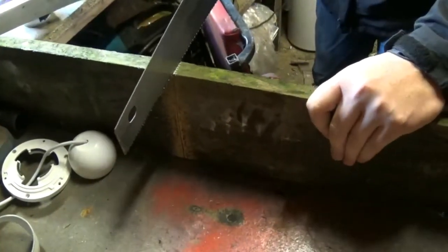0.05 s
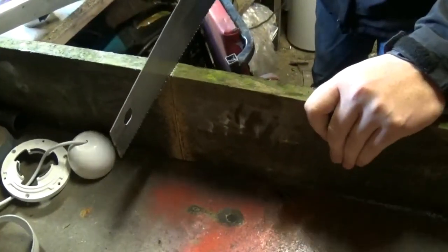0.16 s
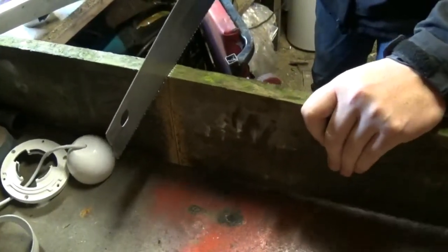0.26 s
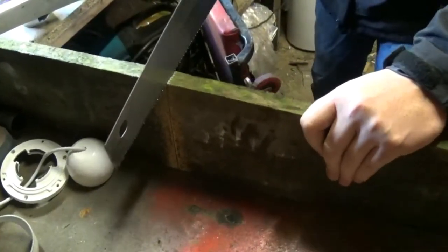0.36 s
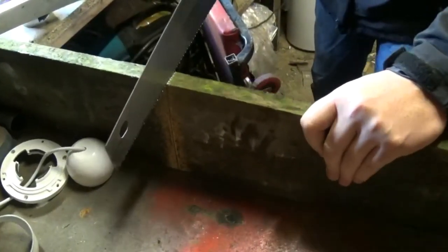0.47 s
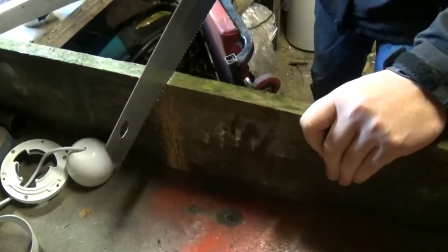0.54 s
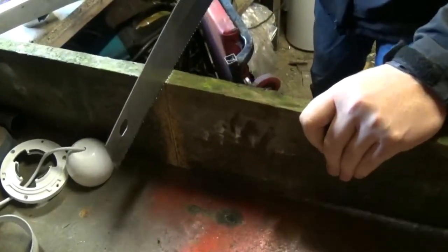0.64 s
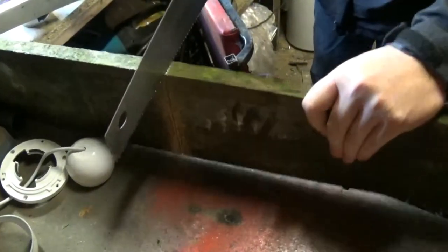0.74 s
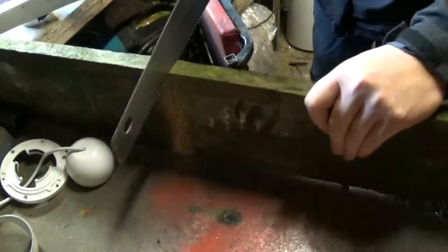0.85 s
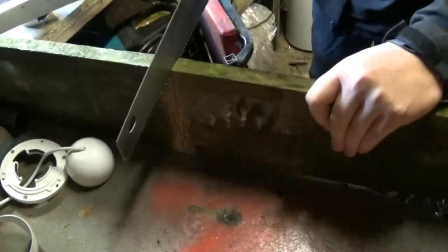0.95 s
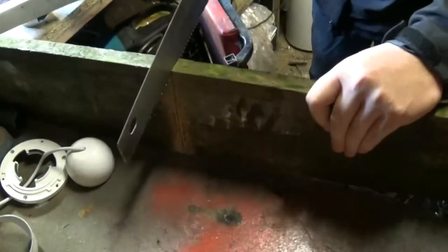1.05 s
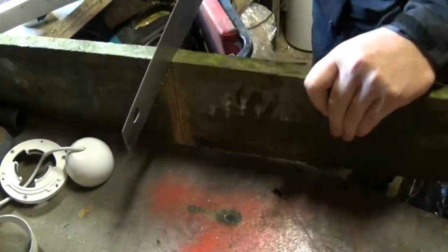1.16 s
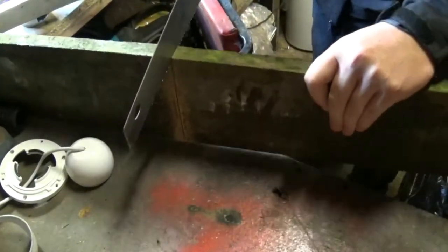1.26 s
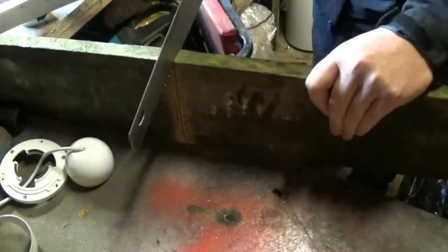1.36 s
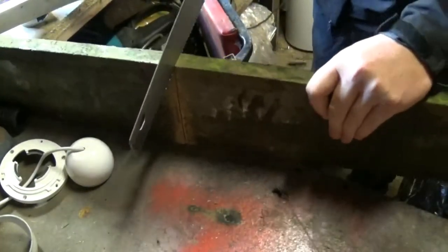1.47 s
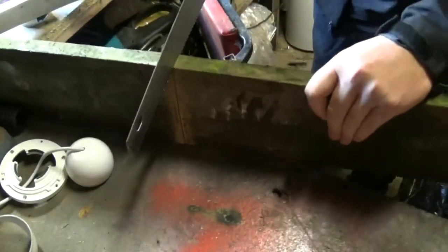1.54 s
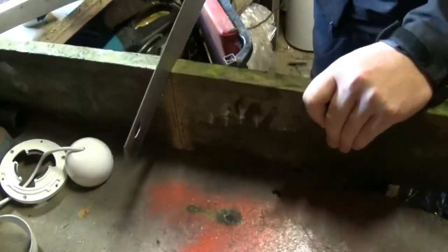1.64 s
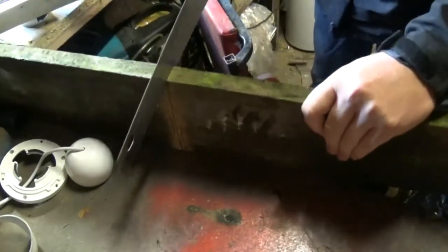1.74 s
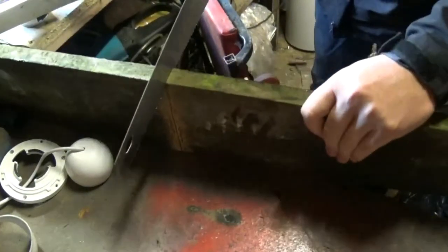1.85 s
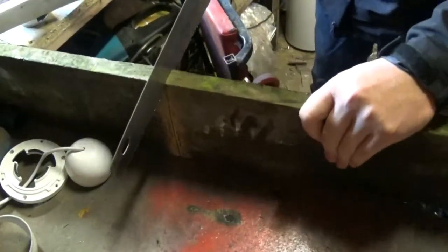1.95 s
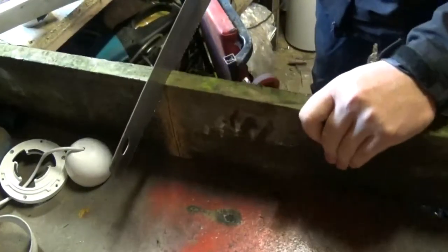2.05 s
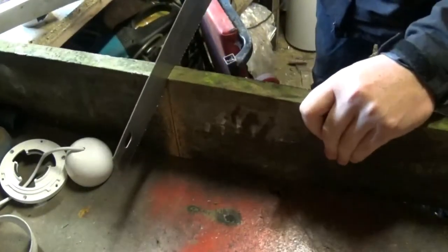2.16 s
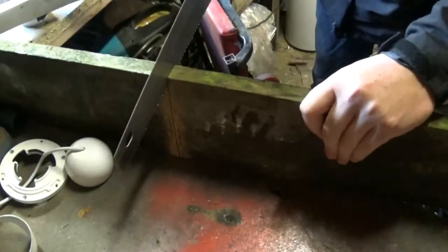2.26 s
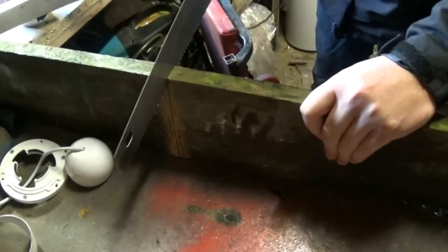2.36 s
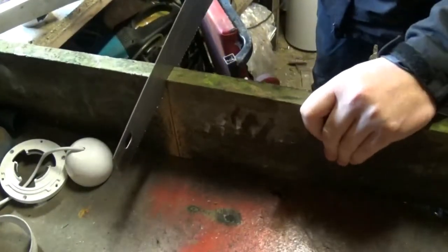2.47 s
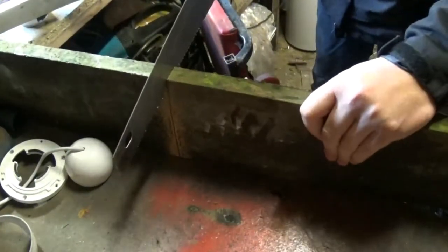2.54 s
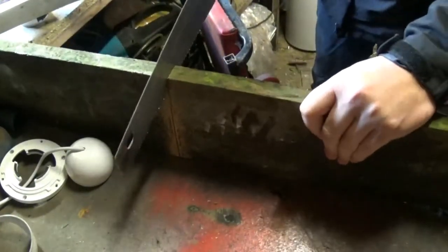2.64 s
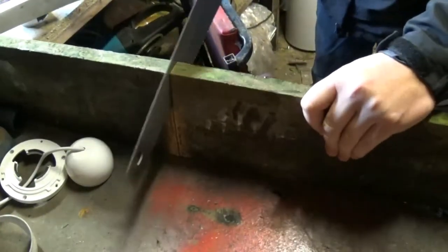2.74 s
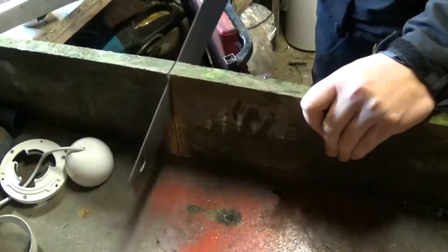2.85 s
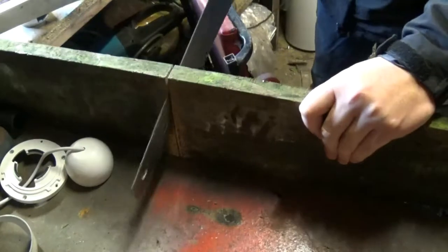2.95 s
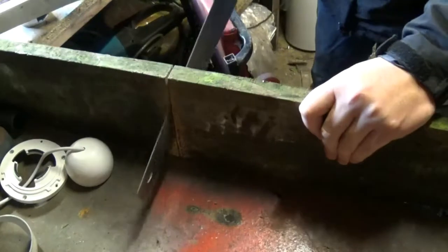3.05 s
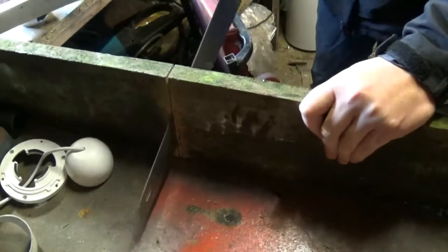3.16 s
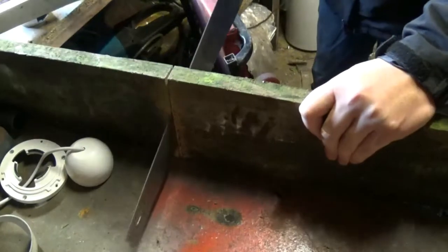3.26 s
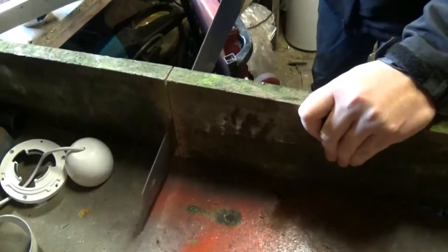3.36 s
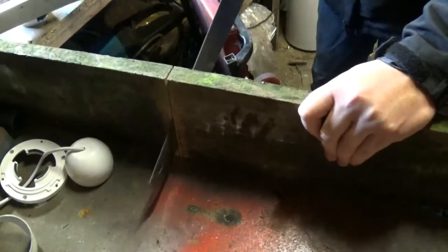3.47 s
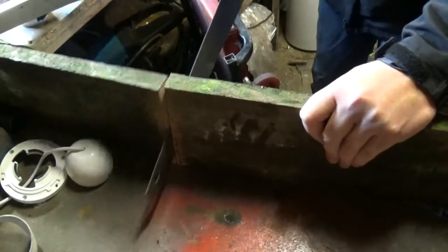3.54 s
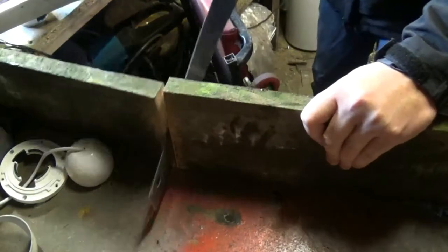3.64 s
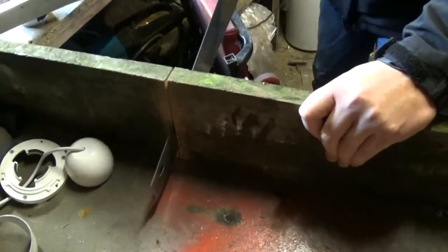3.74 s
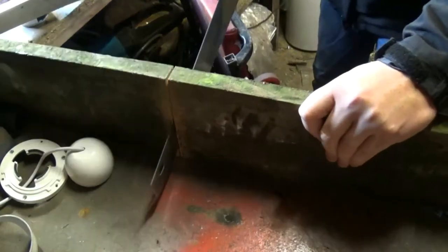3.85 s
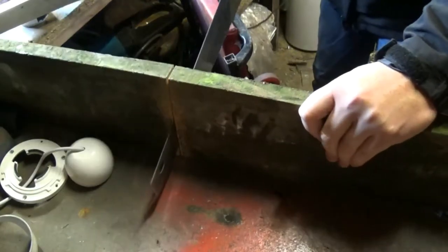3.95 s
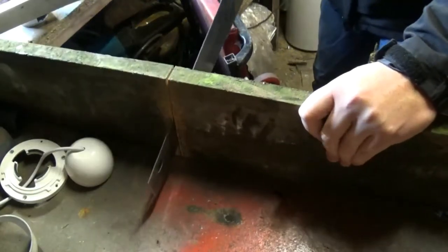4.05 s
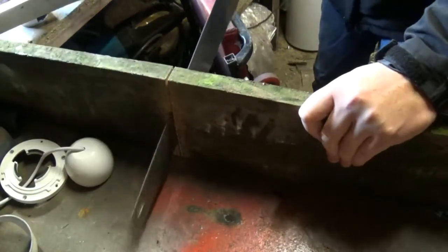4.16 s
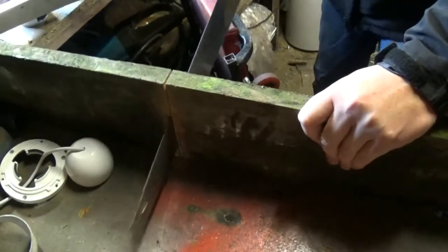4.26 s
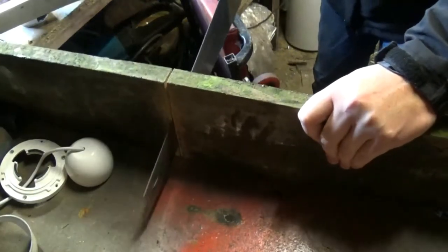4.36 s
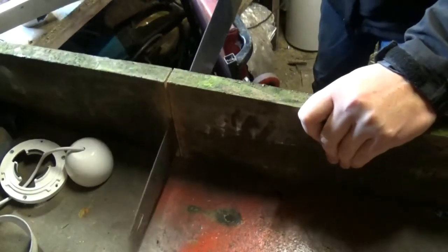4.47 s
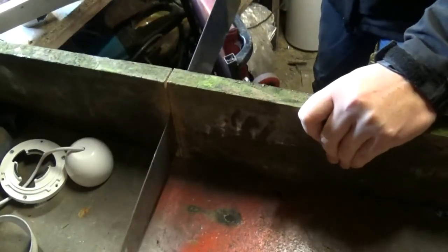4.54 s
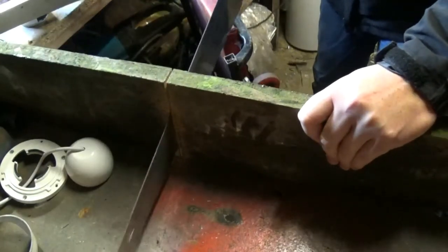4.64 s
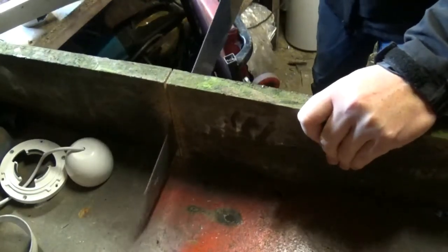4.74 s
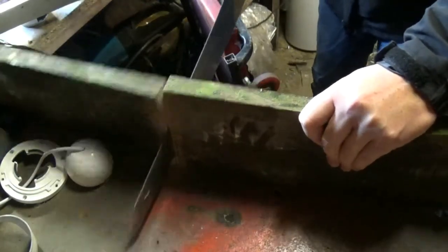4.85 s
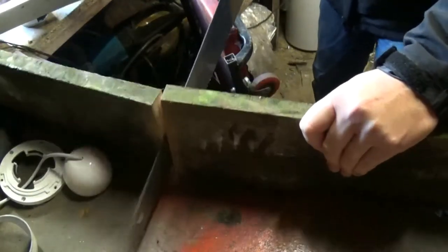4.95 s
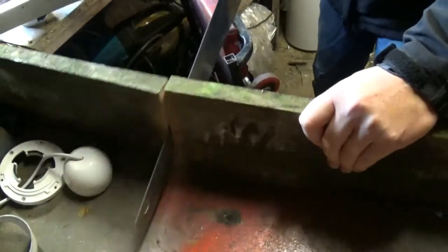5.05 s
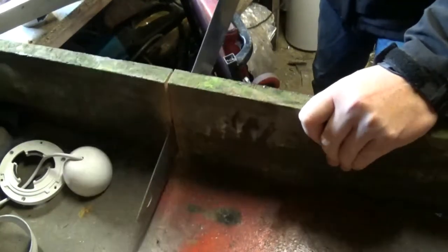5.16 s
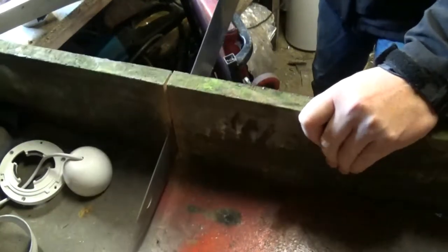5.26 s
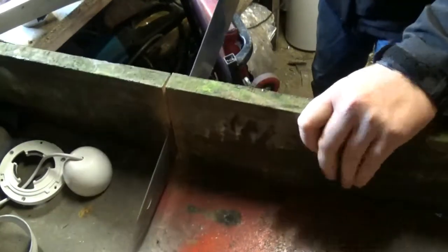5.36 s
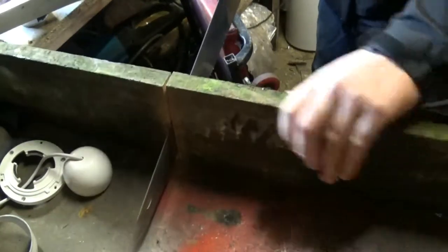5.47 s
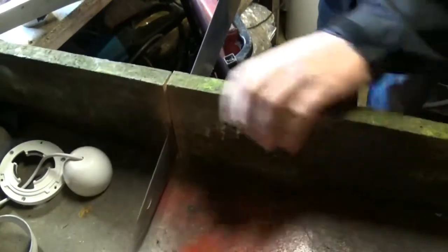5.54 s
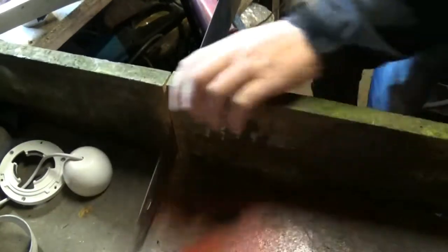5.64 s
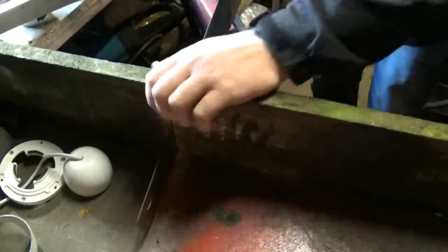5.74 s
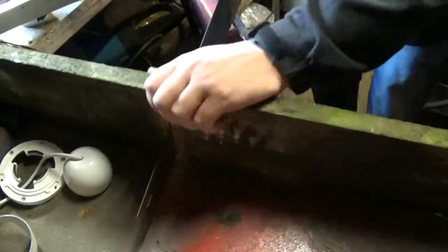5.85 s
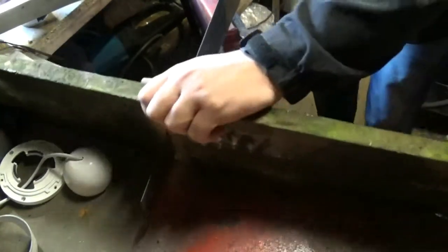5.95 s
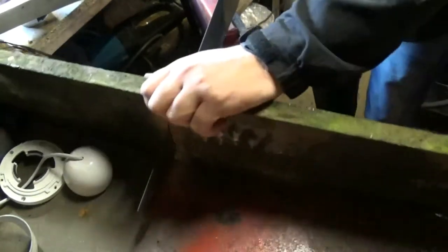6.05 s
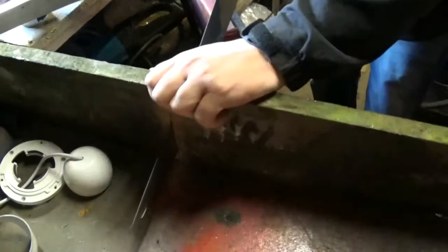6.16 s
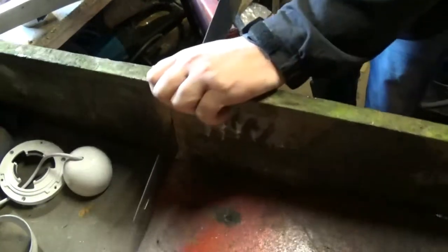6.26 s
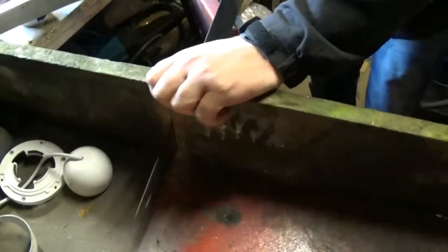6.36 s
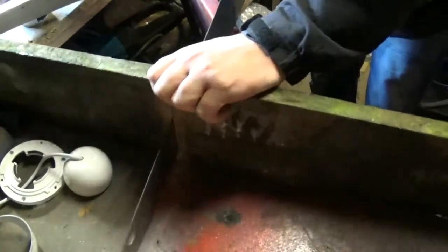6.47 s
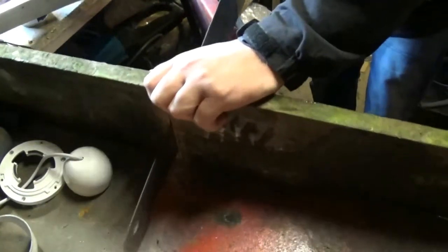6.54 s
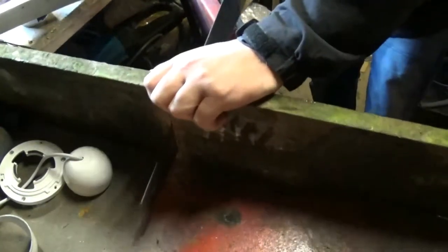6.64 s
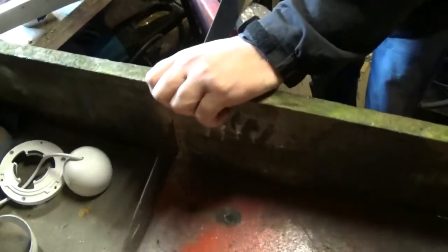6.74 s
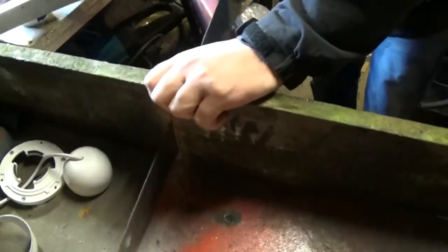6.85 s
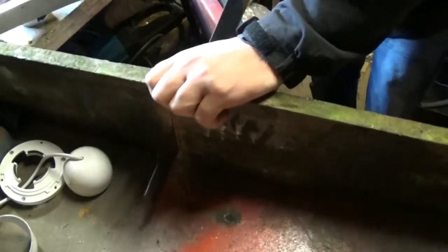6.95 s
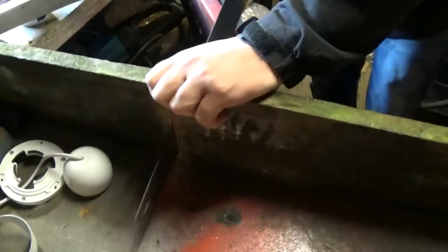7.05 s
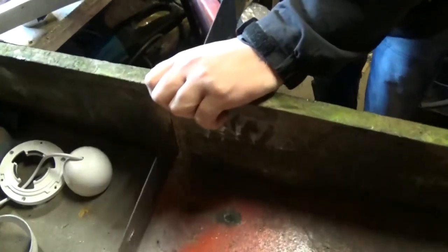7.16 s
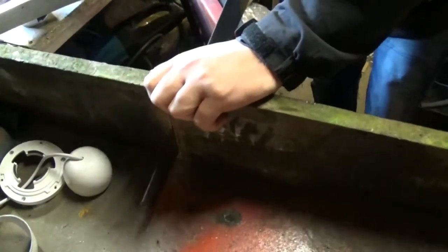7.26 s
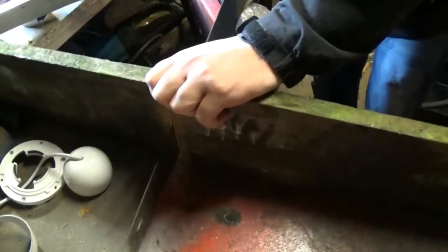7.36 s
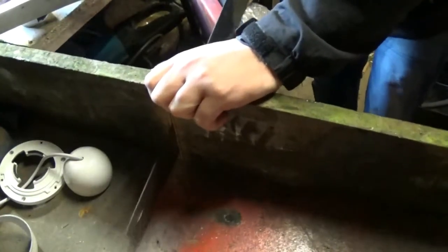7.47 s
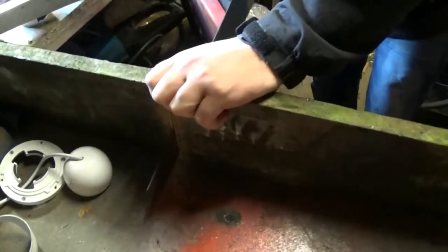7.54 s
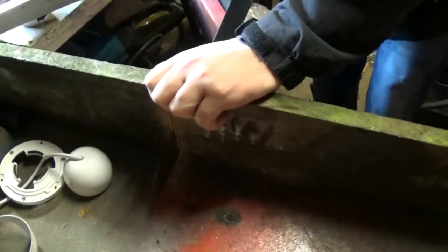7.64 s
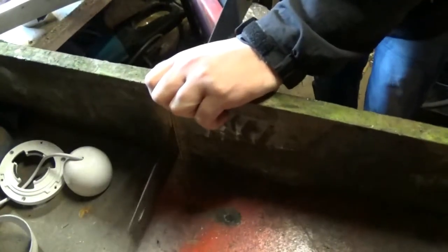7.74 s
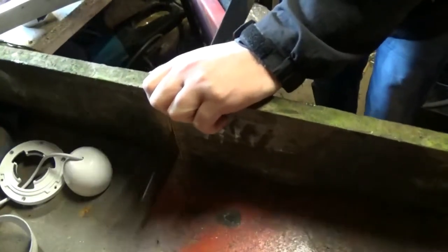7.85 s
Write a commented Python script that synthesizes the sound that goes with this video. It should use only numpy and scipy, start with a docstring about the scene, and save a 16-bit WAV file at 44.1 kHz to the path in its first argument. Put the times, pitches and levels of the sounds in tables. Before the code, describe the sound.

Close, gritty hand sawing through wood: light blade drags and knocks first, halting cuts next, then fast regular rasping with a hollow board rumble.

```python
"""In a small cluttered workshop a hand saw is set into a board on a bench, then driven in short strokes, heard close.
Uneven tooth catches are random pulses: through resonances they drum the board and ring the steel blade, and they
set off hissing noise for torn fibres. The board knocks in decaying sines; the blade clinks and sometimes sings.
Decaying noise makes the room's answer; shaped noise a low murmur of air; pulses a faint tick 25 times a second."""
import sys
import numpy as np
from scipy import signal
from scipy.fft import rfft, irfft, next_fast_len
from scipy.io import wavfile

SR = 44100
rng = np.random.default_rng(int(sys.argv[2]) if len(sys.argv) > 2 else 0)


def wav_record(signal):
    """Record a signal, one row per channel, as 16-bit PCM in the file named by sys.argv[1]."""
    frames = np.transpose(np.atleast_2d(signal))
    bounded = np.clip(frames, -1, 1)
    # unit amplitude maps onto the largest positive 16-bit level
    quanta = np.round(bounded * 32767).astype(np.int16)
    wavfile.write(sys.argv[1], SR, quanta)


N = 348390
t = np.arange(N) / SR

# resonances of the board: f/Hz, width before spread/Hz, relative level/dB
BOARD_MODES = [(62, 20.5, -5.5), (92.4, 12.3, 1), (103.5, 23, -1), (162, 12.8, 1.5), (219.3, 17.3, 2),
               (298.5, 68, -5.5), (379.4, 65, -8), (476.5, 16.3, -5.5), (530.6, 28, -7.5),
               (671, 20.5, -10.5), (810, 44, -13.5)]
# resonances of the steel blade: f/Hz, width before spread/Hz, relative level/dB
BLADE_MODES = [(960, 380, -6.5), (1126, 14.4, 6), (1234, 20, 3.5), (1391, 20, 4), (1734, 26, -0.5),
               (2264, 25, 2), (2477, 36, 1), (2566, 12, 5), (2820, 230, -6.5), (3392, 41, 1.5),
               (3670, 95, -11), (4544, 105, -5.5), (5290, 110, -8.5), (5920, 16, -1)]
# stereo width, narrow in the bass: f/Hz, gain of the side signal/dB
SIDE_WIDTH = [(40, -37), (110, -26.5), (190, -25), (350, -9.5), (620, -10), (1120, -6.5), (2000, -8),
              (3590, -8), (6440, -8), (11600, -9.5)]


def undb(db):
    """Turn decibels into an amplitude factor."""
    return 10 ** (np.asarray(db) / 20)


def unit(x):
    """Scale a signal to an RMS of one."""
    return x / np.sqrt(np.mean(x ** 2))


def colour(x, points):
    """Shape a spectrum by (f/Hz, gain/dB) points joined along log frequency."""
    hz, db = np.transpose(points)
    n = next_fast_len(x.shape[-1])
    f = np.arange(n // 2 + 1) * SR / n
    gain = undb(np.interp(np.log(f + 1), np.log(hz), db))
    return irfft(rfft(x, n) * gain, n)[..., :x.shape[-1]]


def ring(x, modes, spread=0.48, shift_db=0.):
    """Sum of resonances; as the contact point moves, each is driven more or less."""
    at = np.arange(0, N / SR + 1, .06)
    drive = undb(shift_db * np.tanh(rng.standard_normal((len(modes), len(at)))))
    total = 0
    for k, (f, width, db) in enumerate(modes):
        b, a = signal.iirpeak(f, f / (width * spread), SR)
        mode = signal.lfilter(b, a, x * np.interp(t, at, drive[k]))
        total = total + (-1) ** k * undb(db) * mode  # neighbours have opposite signs
    return total


def walk(rate):
    """Random values every 1 / rate s, joined by lines; spread near 1."""
    steps = rng.standard_normal(int(rate * N / SR) + 2)
    return 1.2 * np.interp(t * rate, np.arange(len(steps)), steps)


def tail(t60_s, channels=1):
    """Noise of unit energy that decays by 60 dB in t60_s."""
    s = np.arange(int(t60_s * SR)) / SR
    h = rng.standard_normal((channels, len(s))) * np.exp(-np.log(1000) * s / t60_s)
    return h / np.sqrt(np.sum(h ** 2, axis=1, keepdims=True))


def shifting(x, t60_s, rate):
    """Blend two dense clusters of short echoes by a wandering angle, so the pattern keeps changing."""
    turn = 1.35 * walk(rate)
    paths = signal.oaconvolve(x[None], tail(t60_s, channels=2), axes=1)[:, :N]
    return np.cos(turn) * paths[0] + np.sin(turn) * paths[1]


def air():
    """Workshop murmur: shaped noise whose level wanders a little, its bass nearly shared by both sides."""
    # murmur spectrum: f/Hz, relative level per Hz/dB
    murmur_spectrum = [(12, -36), (20, -12.5), (75, 4.5), (135, -13), (229, -7.5), (379, -19), (596, -16),
                       (1070, -23), (8670, -31.5), (11300, -35), (14700, -65), (22000, -120)]
    murmur = unit(colour(rng.standard_normal((2, N)), murmur_spectrum))
    mid, side = undb(-48 + 1.0 * walk(6.45)) * murmur
    side = undb(1.0) * colour(side, SIDE_WIDTH)
    return np.array([mid + side, mid - side])


def ticks():
    """Regular pulses through two resonances, each tick a little different in level."""
    first_s, period_s = .0089, .04
    pulses = np.zeros(N)
    at = (np.arange(first_s, N / SR, period_s) * SR).astype(int)
    size_db = 1.8 * rng.standard_normal(len(at))
    pulses[at] = undb(-26 + size_db)
    return ring(pulses, [(3470, 200, 14.0), (2800, 450, 1)])


def effort(events, fade_db_s, share=0.99):
    """Power of each event: it rises, follows its slope in dB, then fades, gently at first."""
    rise_curve, knee_s = 1.3, .012  # the hand slows gently before it stops
    start, end, early_db, late_db, rise_s = (c[:, None] for c in events.T)
    s = t[None, ::32]
    along = np.clip((s - start) / np.maximum(end - start, .001), 0, 1)
    after = np.maximum(s - end, 0)
    faded_db = share * fade_db_s * after ** 2 / (after + knee_s)
    db = early_db + (late_db - early_db) * along - faded_db
    rise = np.clip((s - start) / rise_s, 0, 1) ** rise_curve
    return (rise * undb(db)) ** 2


def handling():
    """Levels in dB of hiss, board and blade: powers of overlapping strokes, drags and scuffs add up."""
    # cutting strokes: start t/s, slowing t/s, hiss early level/dB, hiss late level/dB, rise t/s,
    #                  board re hiss early level/dB, board re hiss late level/dB, blade re hiss level/dB
    strokes = [(3.075, 3.199, -27, -23.5, 0.039, 13.5, 6.5, -1.5),
               (3.253, 3.417, -27.5, -29, 0.046, 11.5, 15.5, 4.5),
               (3.966, 4.143, -35.5, -21, 0.034, -2.5, -2, 2),
               (4.195, 4.313, -30, -27, 0.046, 9.5, 13.5, 8),
               (4.331, 4.512, -23.5, -25, 0.041, 9.5, 7, 4.5), (4.549, 4.704, -26, -24, 0.042, 1, 5.5, 4.5),
               (4.807, 4.909, -17.5, -21, .025, -7, 0, -2), (5.95, 6.08, -32.5, -26.5, 0.047, 2, 3.5, -4),
               (6.14, 6.272, -34.5, -29, .065, 14, 3, 4.5), (6.304, 6.435, -22, -24, 0.037, 1, 8, 2.5),
               (6.48, 6.595, -27, -21, .03, 5, 1.5, -0.5), (6.627, 6.749, -22, -23, 0.021, 5.5, 7.5, 3.5),
               (6.79, 6.9, -26, -23, .035, -1, 5.5, 2), (6.939, 7.068, -21, -22.5, .03, 1.5, 9, 1),
               (7.095, 7.213, -27, -23, 0.039, 5, 6.5, 7), (7.252, 7.362, -22, -22, 0.021, 8.5, 3, 2.5),
               (7.405, 7.536, -25, -23.5, 0.046, 4.5, 8, 2), (7.573, 7.689, -21, -22, .028, -5, 5, 2),
               (7.725, 7.849, -25, -21.5, 0.048, 4, 1, 4.5), (7.882, 7.946, -24.5, -34, 0.019, 9.5, 9, 2)]
    # the blade slides lightly without cutting: same columns
    drags = [(-.05, .09, -51, -51, .04, 10, -5.5, 7.5), (.08, .26, -41.5, -39, .06, 0.5, 3, 1),
             (0.547, 0.809, -52, -45, .03, 0.5, 8, 4), (0.894, 1.009, -56, -54, 0.066, 5, -1, 9.5),
             (0.999, 1.121, -43, -43, 0.046, 9, 0.5, 0.5), (1.392, 1.45, -40.5, -41, .04, 7, 21, 5),
             (1.518, 1.617, -43, -38, 0.038, -2, 2.5, 0), (1.638, 1.848, -49.5, -45, 0.028, 10, 2, 5),
             (1.848, 1.953, -29.5, -36, 0.047, -1, -1, -2), (1.976, 2.21, -51, -52, 0.043, -6, 4, 2),
             (2.381, 2.592, -55.5, -47, .04, 6, -3, 1.5), (2.57, 2.639, -38, -37, 0.049, 4, -5, -3.5),
             (2.65, 2.789, -31.5, -39, 0.039, -14, -4.5, -5), (2.851, 2.932, -41, -36, 0.051, -1, -10, 2.5),
             (2.999, 3.091, -40, -36, .03, -6.5, -2, 5), (3.6, 3.729, -48.5, -40, 0.028, 18, -20, -3),
             (3.86, 3.919, -52.5, -53, 0.029, 30, 7.5, 1.5),
             (4.719, 4.809, -34.5, -37, .03, -5.5, 0.5, -10), (4.941, 5.068, -45, -42.5, .04, 9, 5, 0.5),
             (5.482, 5.771, -58, -50, 0.041, -8.5, -5, 5), (5.757, 5.962, -43, -38, .05, 4, 3.5, 3.5)]
    # the teeth scuff once and come to rest:
    # t/s, hiss level/dB, nominal fade/(dB/s), board re hiss level/dB, blade re hiss level/dB
    scuffs = [(.174, -26, 380.5, -11, -0.5), (0.27, -22, 330, 2.5, 4), (0.625, -39, 280, -11.5, 1.5),
              (.843, -42, 320.5, 17.5, 8.5), (1.116, -31, 479.5, -14, -11), (1.379, -47, 500.5, -24, -10),
              (1.555, -40, 400.5, -13, -5), (2.031, -37, 420, -26, -20), (2.42, -48, 300.5, 0, 3),
              (2.973, -26, 330, -12.5, -8), (3.445, -33, 499.5, 0, 6.5), (3.475, -19, 239.5, -16.5, -13.5),
              (3.621, -50, 249.5, 23, 20), (3.72, -35, 400, -20, -25), (4.745, -28.5, 500.5, 7.5, 0),
              (5.37, -57, 300.5, -6.5, -9), (5.471, -36, 621, -24.5, -31), (6.004, -27, 500.5, 5.5, 7),
              (6.355, -20, 499.5, -5, -6), (7.49, -30, 401, 13.5, 5)]
    s, db, scuff_fade, board_db, blade_db = np.transpose(scuffs)
    scuff_rise_s = np.full(len(s), .006)
    scuff_rows = np.array([s, s, db, db, scuff_rise_s, board_db, board_db, blade_db]).T
    groups = [(np.array(strokes), 600), (np.array(drags), 330), (scuff_rows, scuff_fade[:, None])]
    power = 1e-9  # keeps the logarithm finite
    for rows, fade_db_s in groups:
        hiss = effort(rows[:, :5], fade_db_s).sum(axis=0)
        board_rows = np.c_[rows[:, :2], rows[:, 2:4] + rows[:, 5:7], rows[:, 4]]
        # the heavy board dies away slower than the hiss; the blade rings on a little
        board = effort(board_rows, fade_db_s, share=0.61).sum(axis=0)
        blade = undb(2 * rows[:, 7]) @ effort(rows[:, :5], fade_db_s, share=0.9)
        power = power + np.array([hiss, board, blade])
    return [np.interp(t, t[::32], 10 * np.log10(p)) for p in power]


def teeth(hiss_db, slip, scatter_db):
    """One pulse per tooth catch, uneven in time and size; louder strokes catch more often."""
    full_rate_hz, full_stroke_db = 192.1, -22
    hz = full_rate_hz * undb(.25 * np.clip(hiss_db - full_stroke_db, -30, 6))
    catches = np.floor(np.cumsum(hz * np.exp(slip * walk(150))) / SR)
    return np.diff(catches, prepend=0) * undb(scatter_db * rng.standard_normal(N))


def saw():
    """Catches drum the board and ring the blade; each tears off a burst of fibre hiss."""
    # fibre hiss spectrum: f/Hz, relative level per Hz/dB
    hiss_spectrum = [(290, -50), (500, -6), (600, -15), (810, -10.5), (985, -23.5), (1250, -9), (2070, -15),
                     (2460, -11.5), (3930, -10), (9410, -10), (11300, -17), (14700, -47), (22000, -120)]
    # treble level of the hiss over time, dullest near 0.4 s: t/s, gain/dB
    sheen = [(0, 1.5), (.4, -9), (.6, -1), (1.3, -2), (1.9, 0.5), (2.6, 0.5), (5.8, 0.5), (6.2, 2),
             (7.9, 1.5)]
    # tone of the board, its upper modes stronger late on: t/s, gain of deep modes/dB, gain of upper modes/dB
    board_tone = [(0, 0.5, 1), (1.5, 1, -1.5), (2.3, 0, -1.5), (3.2, 2.5, -2.5), (4.4, 2.5, -2),
                  (5.0, 1, 1), (6.0, -3, 1), (6.7, -3, 3), (7.9, -2, 0.5)]
    hiss_db, board_db, blade_db = handling()
    pulses = teeth(hiss_db, slip=.35, scatter_db=3.5)
    bursts = signal.lfilter([1], [1, -np.exp(-1 / (0.0015 * SR))], pulses)  # 1.5 ms decay
    # the hand's pressure wavers through a stroke
    pressure = undb(1.95 * walk(50))
    grit = rng.standard_normal((3, N)) * (0.77 + unit(bursts) * 0.27) * pressure

    # wood gives: the board feels each catch as a soft push
    push = unit(pulses - pulses.mean()) + 0.52 * rng.standard_normal(N)
    push = colour(push, [(30, -33), (70, -1), (600, -1.5), (2500, 0)])
    board = ring(undb(board_db) * push, BOARD_MODES, spread=0.95, shift_db=5.5)
    s, deep_db, upper_db = np.transpose(board_tone)
    for db, band in [(deep_db, [(110, 0), (200, -30)]), (upper_db, [(280, -30), (420, 0)])]:
        board = board + (undb(np.interp(t, s, db)) - 1) * colour(board, band)

    shake = undb(blade_db) * grit[:2]
    blade = ring(shake[0], BLADE_MODES, spread=1.6, shift_db=7.5)
    # the kerf walls grip the blade: a dull, broad rattle under its ring
    kerf = colour(shake[1], [(300, -3), (700, -1.5), (2000, -3.5), (4000, -30.0)])

    hiss = undb(hiss_db) * unit(colour(grit[2], hiss_spectrum))
    treble = colour(hiss, [(5000, -30), (7500, 0)])
    hiss = hiss + (undb(np.interp(t, *np.transpose(sheen))) - 1) * treble
    # the blade's crowded upper modes colour part of the hiss
    hiss = undb(-3.5) * hiss + undb(-2.5) * shifting(hiss, t60_s=.03, rate=14)
    return undb(18.5) * board + undb(5) * blade + undb(6.5) * kerf + hiss


def knocks():
    """Each blow shakes the spot it lands on for a few cycles, and that drives the board's modes."""
    # the board knocks on the bench:
    # t/s, shake level before the mix/dB, f of the spot struck/Hz, decay time (held to 2-30)/ms
    blows = [(0.163, -22, 302, 11), (0.218, -26, 274, 17), (0.331, -25, 155, 31), (0.78, -31, 252, 10),
             (0.843, -20.5, 301, 25), (1.015, -24, 308, 25), (1.42, -21, 86.1, 20.2),
             (1.448, -10.5, 262, 5.6), (3.621, -34, 243.3, 10.23), (4.251, -11, 211.3, 7.05),
             (4.745, -12, 233.2, 5.75), (4.822, -12, 850, 2.9)]
    push = np.zeros(N + SR)
    age = np.arange(int(.1 * SR)) / SR
    for s, db, hz, ms in blows:
        shaking = np.sin(2 * np.pi * hz * age) * np.exp(-1000 * age / np.clip(ms, 2, 30))
        i = int(s * SR)
        push[i:i + len(age)] += undb(db) * shaking
    push = push[:N]
    return undb(3.5) * push + undb(-2.0) * ring(push, BOARD_MODES, spread=1.2)


def singing():
    """The dragging blade sings briefly: friction noise through one narrow resonance swells and fades."""
    # sung notes: start t/s, end t/s, f/Hz, RMS level before the swell/dB
    notes = [(0.168, 0.188, 3670, -25.5), (.174, 0.208, 5360, -40), (0.176, 0.236, 3140, -40),
             (0.548, 0.622, 3230, -51), (0.797, 1.23, 1276, -51.5), (1.02, 1.07, 2984, -42.5),
             (1.815, 1.952, 735, -37.5), (1.95, 2.3, 2760, -52), (2.025, 2.216, 1234, -58),
             (2.423, 2.524, 1300, -60.5), (2.679, 2.794, 4600, -42.5), (3.141, 3.196, 1737, -29),
             (4.601, 4.73, 2509, -25.5), (4.873, 4.956, 2386, -32.5), (6.545, 6.616, 3440, -26)]
    out = np.zeros(N)
    for start, end, hz, db in notes:
        i, n = int(start * SR), int((end - start) * SR)
        b, a = signal.iirpeak(hz, 35., SR)
        note = signal.lfilter(b, a, rng.standard_normal(SR))[:n]
        out[i:i + n] += undb(db) * unit(note) * np.sqrt(np.hanning(n))
    return out


def clinks():
    """A sharp crack with its own pitch excites the blade modes, most strongly near that pitch."""
    # the blade clinks or a tooth snags:
    # t/s, noise peak level before filters/dB, f of the crack/Hz, drive of the ring re crack/dB
    snags = [(0.174, -27, 3600, 21), (0.272, -4.5, 1530, -9), (0.3007, -8.5, 1560, 9),
             (0.629, -25, 3870, 7), (0.845, -27, 1565, 2), (1.1187, -23.5, 2630, 17),
             (1.3828, -28.5, 2814, -13), (1.558, -41, 2890, -27), (2.0335, -44, 2990, -21),
             (2.9765, -25, 3456, -12.5), (3.108, -12, 2524, 0), (3.2884, -24.5, 3210, -5.5),
             (3.476, -10, 5420, -28), (3.6249, -20, 1500, -5), (3.8825, -32.5, 1893, 1),
             (3.995, -49, 2588, -28), (4.748, -17.5, 5784, -5), (4.8252, -20, 6220, 1),
             (5.475, -58, 6390, -13), (6.003, -24.5, 1558, -11), (6.327, -18, 1490, 12),
             (6.963, -23.5, 3340, -9.5), (7.2724, -29, 3428, -8)]
    crack, strike = np.zeros((2, N + SR))
    for s, db, hz, ring_db in snags:
        burst = tail(.012)[0]
        burst = undb(db) * burst / np.abs(burst).max()
        broad = signal.lfilter(*signal.iirpeak(hz, .9, SR), burst)
        pitched = signal.lfilter(*signal.iirpeak(hz, 8., SR), burst)
        i = int(s * SR)
        crack[i:i + len(burst)] += broad + 2.0 * pitched
        strike[i:i + len(burst)] += undb(ring_db) * broad
    ringing = ring(strike[:N], BLADE_MODES, spread=1.3, shift_db=4)
    return undb(6.0) * crack[:N] + undb(8.5) * ringing


def workshop(near):
    """Cluttered room: decaying noise differs on each side and its treble is strongly damped."""
    room = signal.fftconvolve(near[None], tail(0.31, channels=2), axes=1)[:, :N]
    return undb(-12.5) * colour(room, [(100, -1.5), (2000, 3.0), (10000, -42)])


def scene():
    """Mix the close saw, widened to stereo, with the room, the murmur and the ticks."""
    near = saw() + singing() + knocks() + clinks()
    # board and blade are wide: each side hears different parts of them, and these keep changing
    side = undb(-0.5) * colour(shifting(near, t60_s=0.043, rate=48), SIDE_WIDTH)
    return near + np.array([side, -side]) + workshop(near) + air() + ticks()


def record(dry):
    """Round the loudest peaks softly, then cut the top steeply above 11050 Hz."""
    rounded = np.tanh(1.4 * dry) / 1.4
    low_pass = signal.ellip(12, .3, 80, 11050, fs=SR, output="sos")
    return signal.sosfilt(low_pass, rounded)


dry = scene()
out = record(dry)
wav_record(out)
```